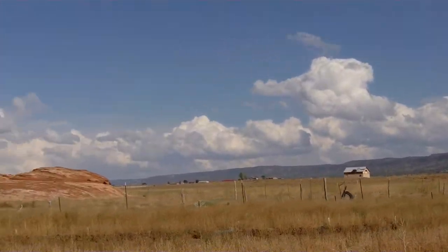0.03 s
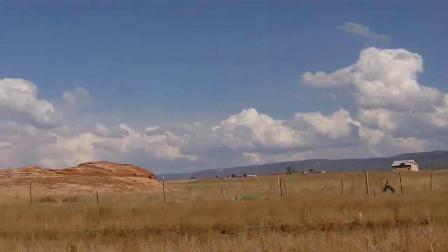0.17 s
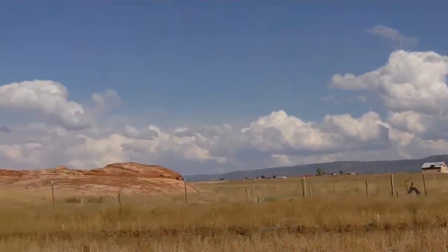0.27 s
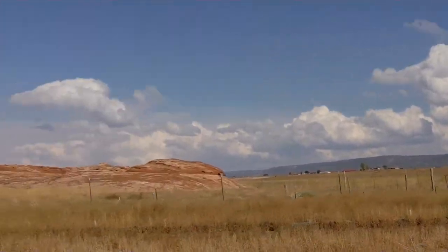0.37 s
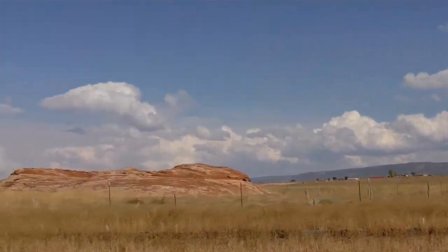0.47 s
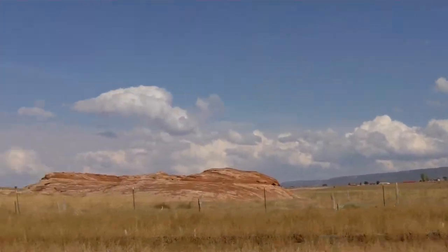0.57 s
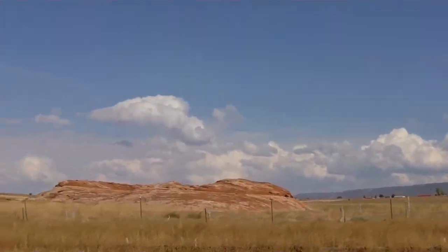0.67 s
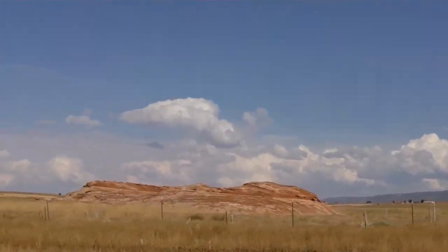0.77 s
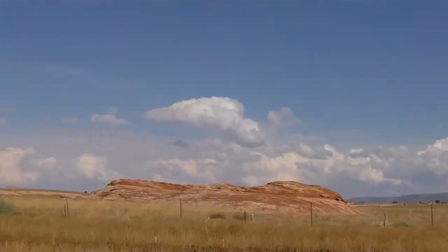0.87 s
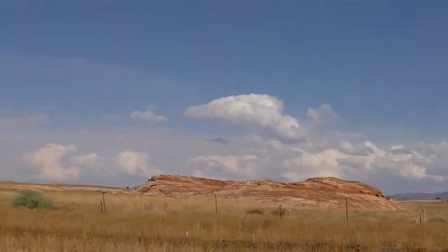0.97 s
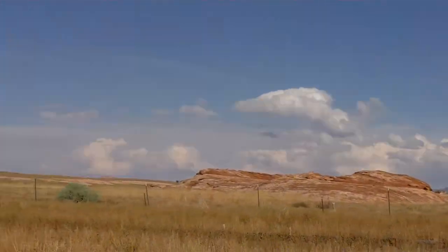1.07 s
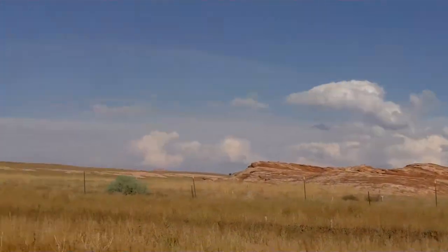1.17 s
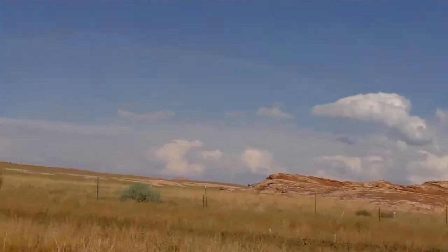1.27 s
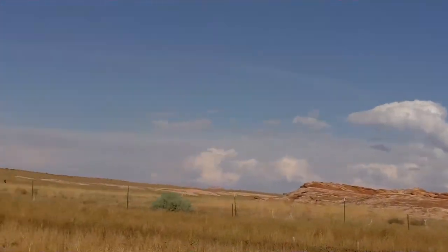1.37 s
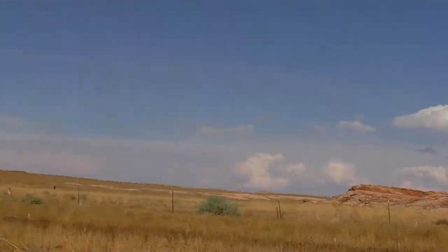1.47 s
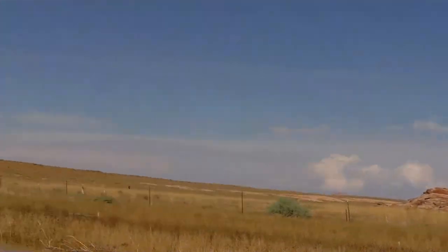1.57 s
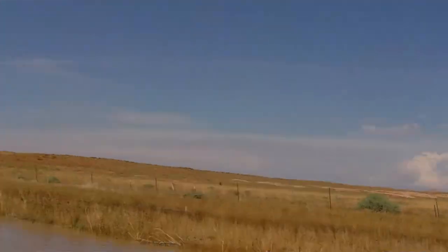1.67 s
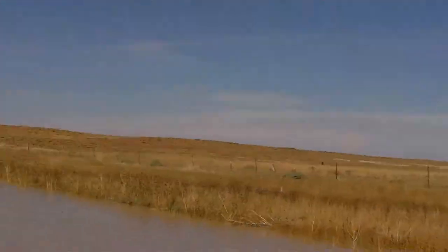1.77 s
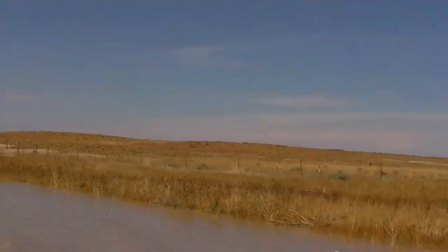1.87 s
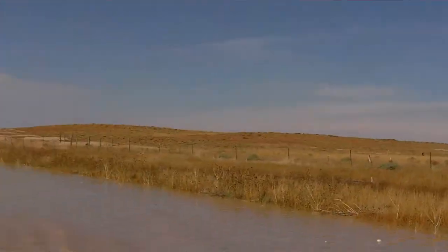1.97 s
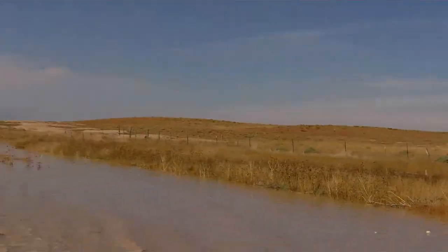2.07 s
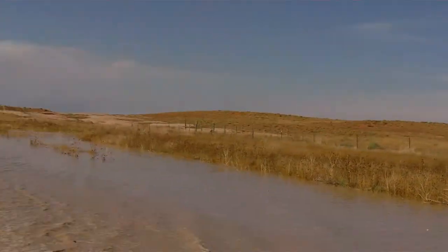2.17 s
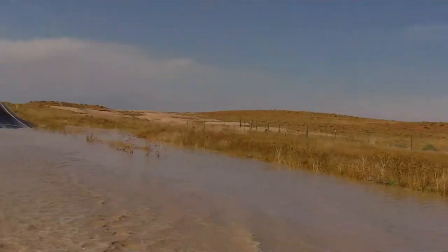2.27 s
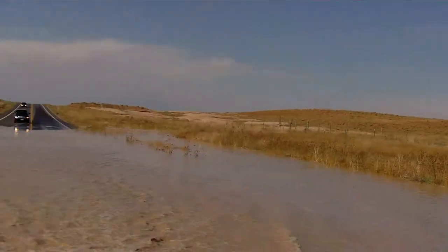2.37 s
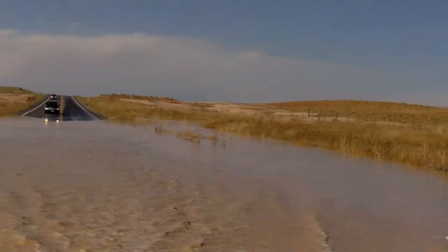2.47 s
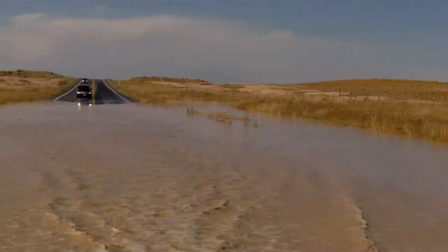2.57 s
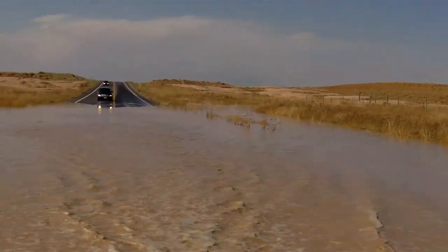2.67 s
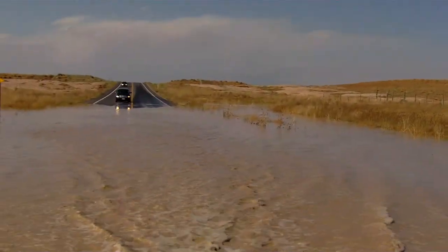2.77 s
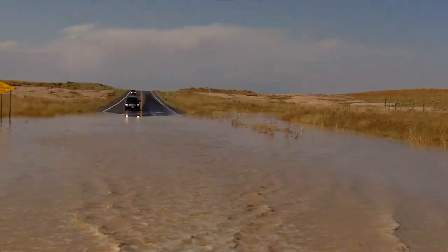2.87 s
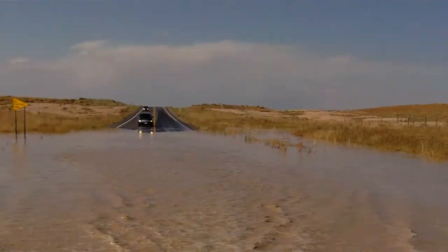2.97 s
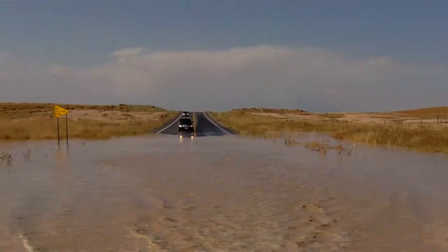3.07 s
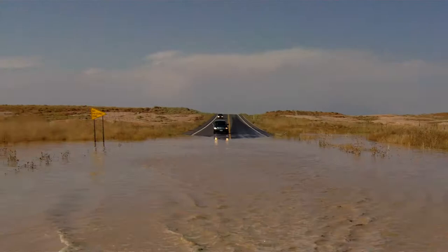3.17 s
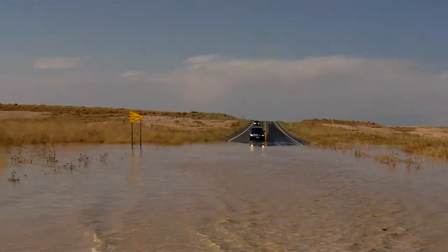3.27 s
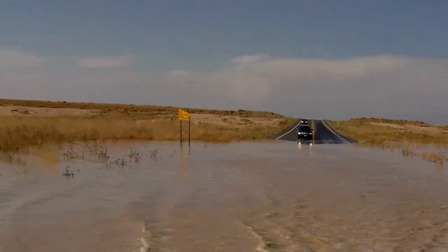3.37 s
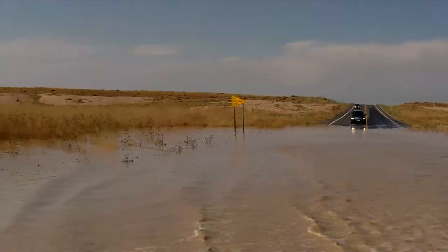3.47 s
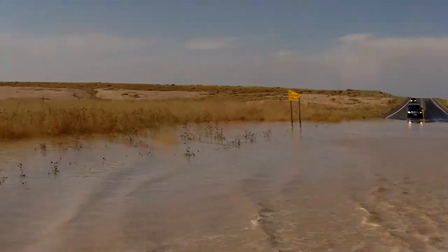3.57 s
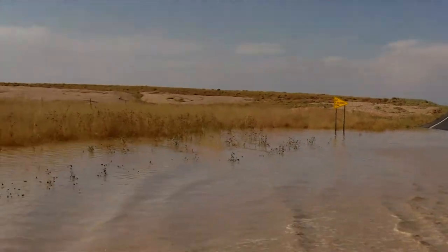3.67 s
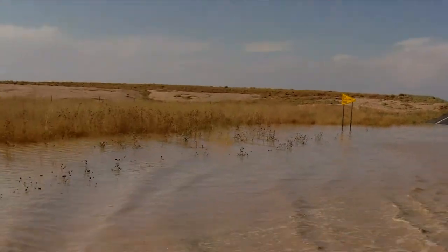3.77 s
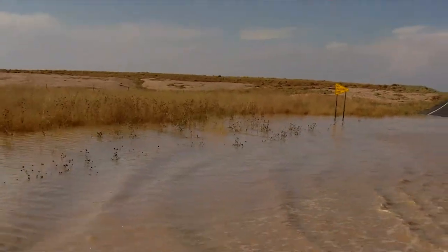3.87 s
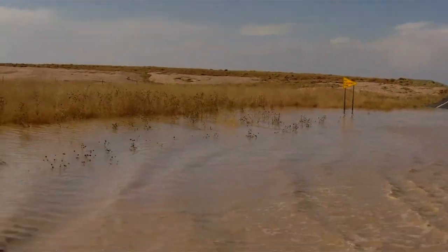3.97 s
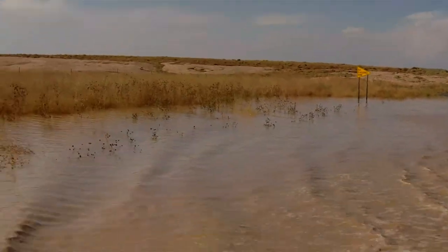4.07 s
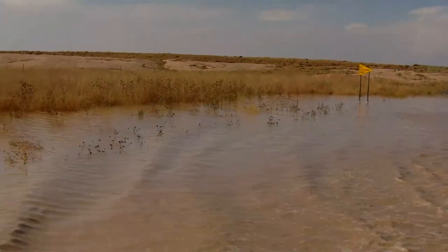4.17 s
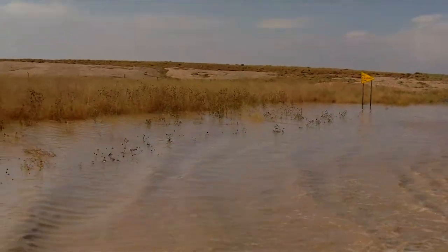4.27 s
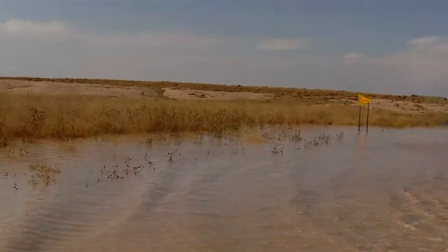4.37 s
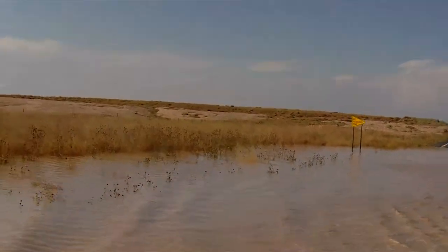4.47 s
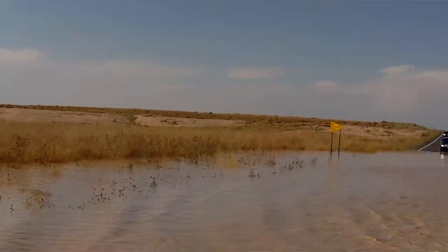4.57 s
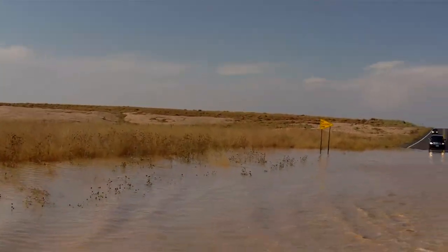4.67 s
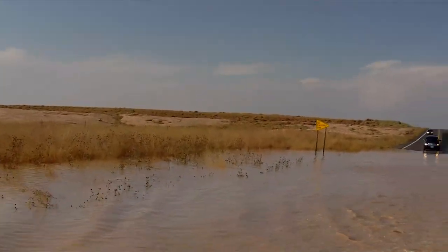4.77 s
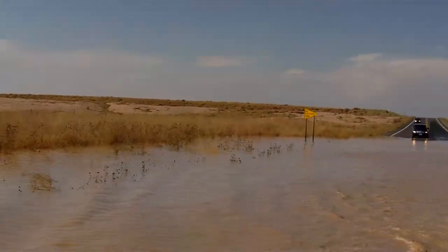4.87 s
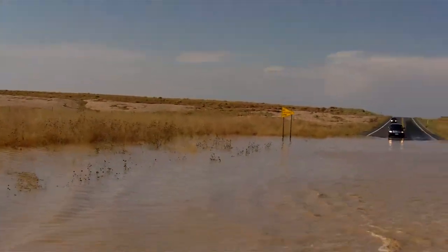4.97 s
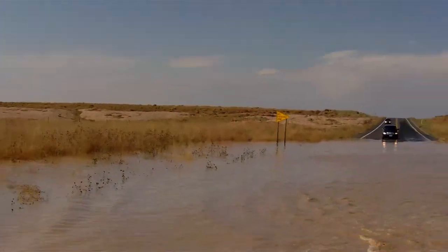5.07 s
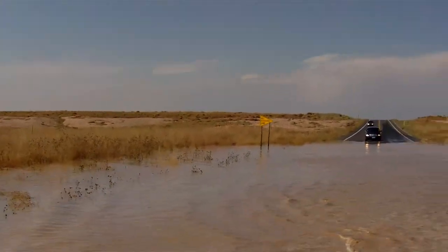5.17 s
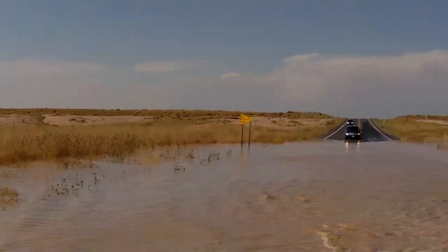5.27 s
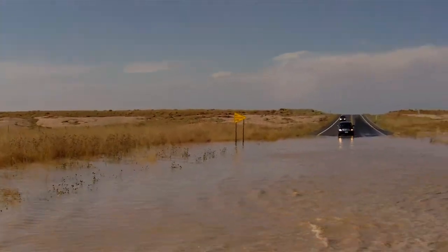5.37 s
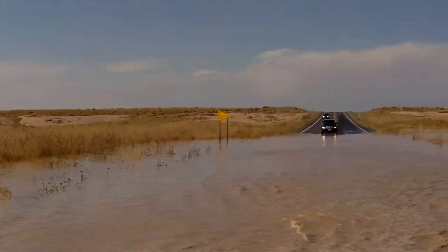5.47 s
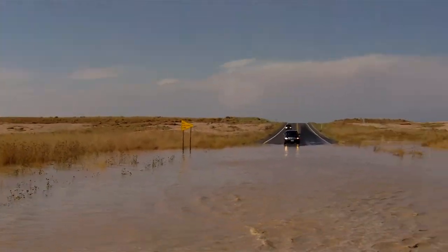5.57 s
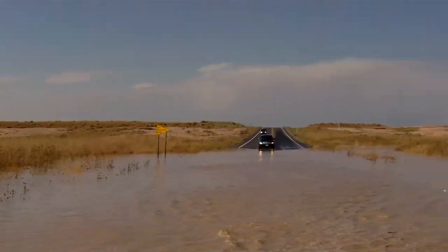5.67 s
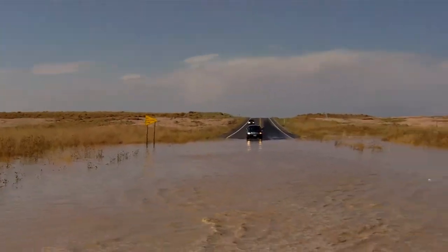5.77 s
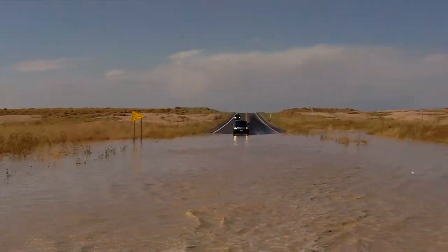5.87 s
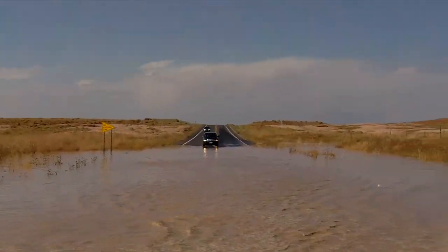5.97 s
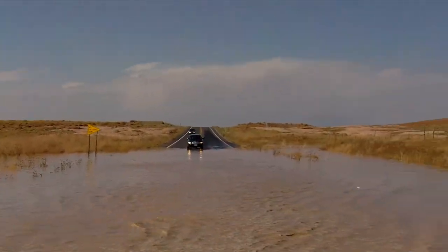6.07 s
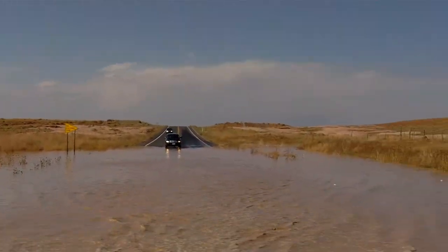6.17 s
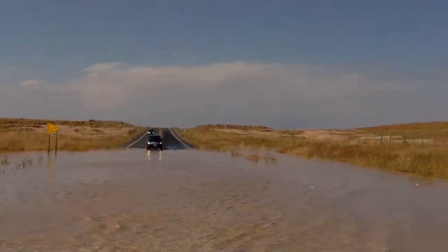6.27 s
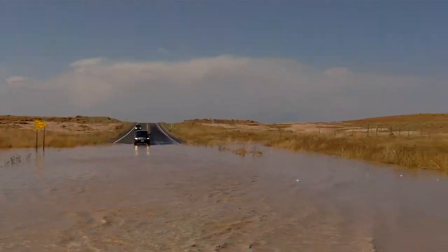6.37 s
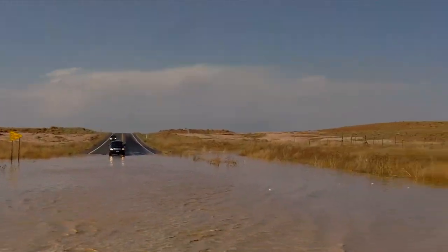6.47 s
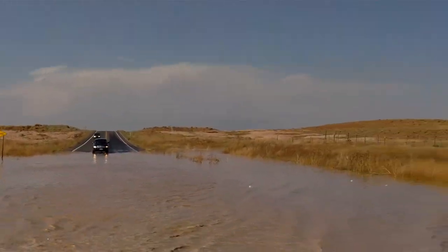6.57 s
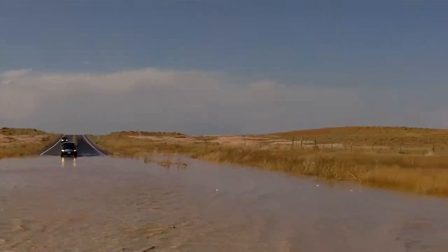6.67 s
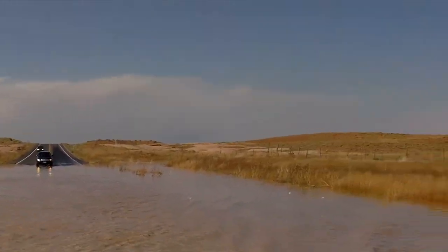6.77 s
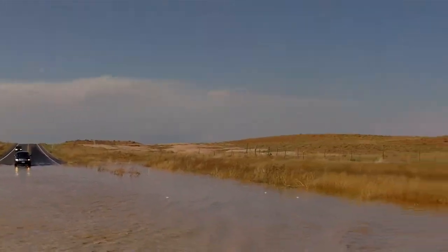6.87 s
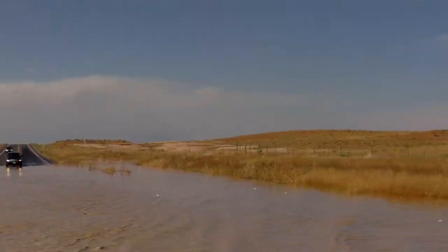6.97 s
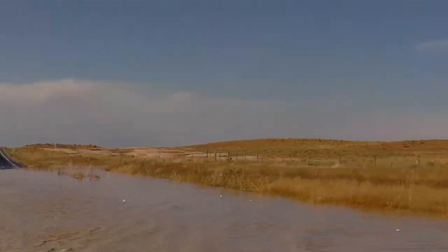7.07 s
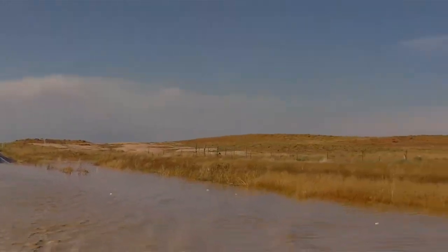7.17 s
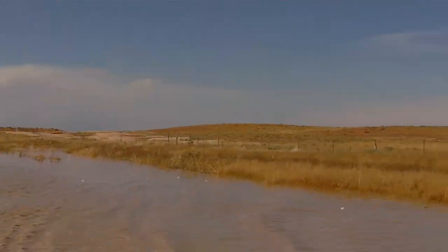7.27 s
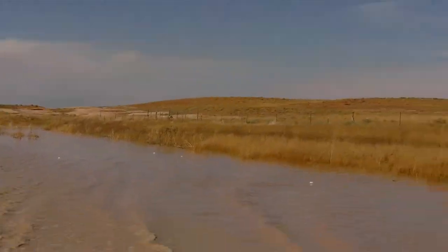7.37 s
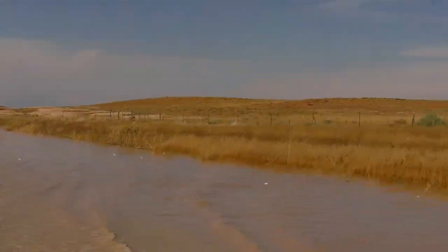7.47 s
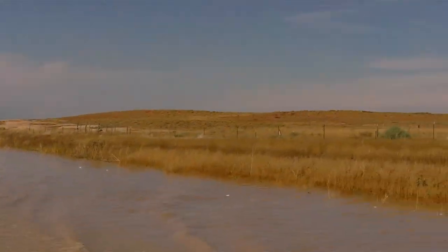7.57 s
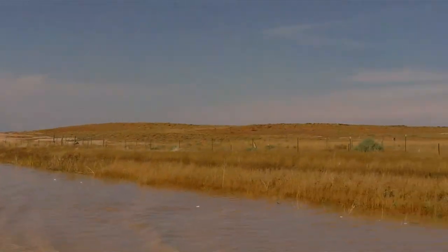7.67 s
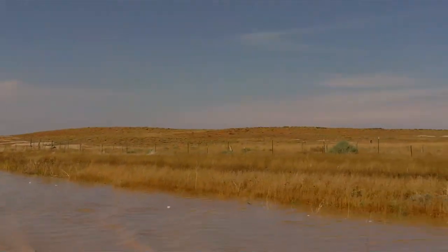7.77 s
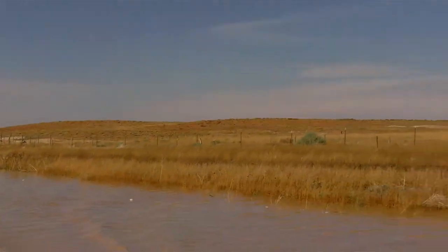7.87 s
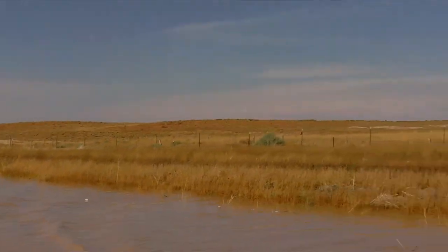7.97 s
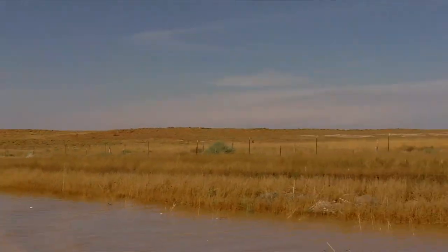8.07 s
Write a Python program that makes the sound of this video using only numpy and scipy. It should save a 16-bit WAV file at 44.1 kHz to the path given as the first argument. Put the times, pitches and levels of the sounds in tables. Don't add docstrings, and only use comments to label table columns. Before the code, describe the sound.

Shallow floodwater rushes steadily across a country road, dull and distant at first, then brighter with fizzing wavelets, gurgles and small drops close by.

```python
import sys
import numpy as np
from scipy import signal
from scipy.fft import rfft, irfft, next_fast_len
from scipy.io import wavfile
from scipy.ndimage import uniform_filter1d, map_coordinates

SR = 44100
rng = np.random.default_rng(int(sys.argv[2]) if len(sys.argv) > 2 else 0)


def attenuation_scalar(level_db):
    decades = np.asarray(level_db, float) / 20
    return 10 ** decades


def store_wav(level_fs):
    pcm = np.round(np.clip(np.atleast_2d(level_fs), -1, 1) * 32767)
    wavfile.write(sys.argv[1], SR, pcm.T.astype(np.int16))


N = 358533


def unit(x):
    return x / np.sqrt(np.mean(x ** 2) + 1e-20)


def curves(rows):
    time_s, *columns = np.transpose(rows)
    return [np.interp(np.arange(N) / SR, time_s, c) for c in columns]


def wobble(rate_hz):
    knots = rng.standard_normal(int(N * rate_hz / SR) + 4)
    return map_coordinates(knots, [np.arange(N) * rate_hz / SR])


def swells(time_s, height_db, half_s):
    t = np.arange(0, N + 64, 64) / SR
    bells = np.exp(-.5 * ((t[:, None] - time_s) / np.maximum(half_s, .01)) ** 2) @ height_db
    return np.interp(np.arange(N) / SR, t, bells)


def filtered(x, response):
    m = next_fast_len(N + 8192)
    return irfft(rfft(x, m) * response(np.fft.rfftfreq(m, 1 / SR)), m)[..., :N]


def coloured(x, spectrum):
    f, db = np.transpose(spectrum)
    return unit(filtered(x, lambda hz: attenuation_scalar(np.interp(np.log(hz + 1), np.log(f), db, -120, -120))))


def rush(patchy_db):
    z = signal.stft(rng.standard_normal(N + 512), nperseg=512)[2]
    field = uniform_filter1d(rng.standard_normal(z.shape), size=8, axis=0)
    field = uniform_filter1d(field, size=8, axis=1)
    return signal.istft(z * attenuation_scalar(patchy_db * unit(field)), nperseg=512)[1][:N]


def bubbles(count, pitch_hz, octaves, cycles, scatter_db, size):
    at, chance = rng.random(count), rng.standard_normal(count)
    gain = attenuation_scalar(scatter_db * rng.exponential(size=count))[:, None]
    hz = np.clip(pitch_hz * 2 ** (octaves * chance), 150, 15000)
    turns = hz[:, None] * np.arange(size) / SR
    fade = np.exp(-turns / cycles) * np.hanning(2 * size)[size:]
    tone = np.sin(2 * np.pi * turns * (1 + 0.037 * turns / cycles)) * fade
    where = (at * N).astype(int)[:, None] + np.arange(size)
    return unit(np.bincount(where.ravel(), (gain * tone).ravel(), N + size)[:N])


# (frequency [Hz], density [dB per Hz])
CHURN_COLOUR = [(350, -37), (600, -9), (850, -1.5), (1100, -1), (1400, -2.5), (1750, -6.5), (2400, -14),
                (4000, -34.5)]


def churn():
    large = bubbles(count=6000, pitch_hz=1300, octaves=.45, cycles=2.2, scatter_db=1.0, size=220)
    return coloured(rush(patchy_db=0.37) + 0.3 * large, CHURN_COLOUR)


# (frequency [Hz], density [dB per Hz])
FIZZ_COLOUR = [(700, -17), (1300, -9.5), (1900, -2), (2150, -0.5), (2450, -1), (2750, -3), (3600, -5.5),
               (5000, -9.5), (7000, -15.5), (10000, -42)]


def fizz():
    small = bubbles(count=9000, pitch_hz=3375, octaves=.55, cycles=1.4, scatter_db=1.5, size=120)
    return coloured(rush(patchy_db=0.9) + 0.37 * small, FIZZ_COLOUR)


# (frequency [Hz], density [dB per Hz])
SPRAY_COLOUR = [(2500, -5), (4000, -2.5), (5500, -2), (7000, -2), (9000, -3), (11000, -5.5), (13000, -9),
                (15500, -15)]


def spray():
    bursts = bubbles(count=12000, pitch_hz=6910, octaves=0.48, cycles=1.0, scatter_db=2.5, size=40)
    return coloured(rush(patchy_db=1.2) + 0.43 * bursts, SPRAY_COLOUR)


# (time [s], height [dB], share of large bubbles [ratio], half length [s])
CRESTS_ASIDE = [
    (0.23, 0.5, 1.8, 0.03),
    (0.61, 2, 0.95, 0.063),
    (0.91, 3, 0.21, 0.032),
    (1.14, 2, 0.0, 0.073),
    (1.22, 3.5, 0.0, 0.021),
    (1.35, 4, 0.0, 0.056),
    (1.58, 3.5, 0.02, 0.079),
    (1.88, 6, 0.24, 0.062),
    (2.07, 3.5, 0.44, 0.071),
]
# (time [s], height [dB], share of large bubbles [ratio], half length [s])
CRESTS_AHEAD = [(2.37, 2.7, 0.59, 0.03), (2.59, 3.1, 0.056, 0.046), (2.75, 2.9, 0.97, 0.038),
                (2.94, 3.8, 0, 0.025), (3.39, 2.5, 0.72, 0.037), (3.56, 3.1, 0.54, 0.058),
                (3.76, 1.7, 0.3, 0.053), (3.92, 2.4, 0.5, 0.067), (4.11, 3.2, 0.41, 0.036),
                (4.25, 3.2, 0.62, 0.082), (4.46, 2.8, 0.3, 0.048), (4.59, 3.5, 0.27, 0.056),
                (4.75, 1.6, 0.25, 0.022), (4.92, 3.7, 0.64, 0.077), (5.14, 1.8, 0.95, 0.018),
                (5.43, 1.9, 1.15, 0.04), (5.73, 3.7, 0.0, 0.063), (5.85, 3.7, 0.47, 0.031),
                (6.03, 2.3, 0.0, 0.043), (6.21, 0.91, 1.6, 0.023), (6.41, 3.5, 0.16, 0.028),
                (6.67, 4.8, 0.43, 0.053), (6.91, 4.4, 0.35, 0.039), (7.12, 3.4, 0.25, 0.081),
                (7.32, 4.7, 0.0, 0.057), (7.51, 5.3, 0.73, 0.084), (7.67, 4.7, 0.55, 0.048),
                (7.85, 6.6, 0.51, 0.077), (8.03, 6.4, 0.37, 0.095)]
# (time [s], near water on axis [dB], far riffles in view [dB])
TURN = [(0.0, -10, -29), (0.5, -11, -30.0), (1.0, -10.1, -31), (1.5, -8.5, -31), (1.75, -7, -29),
        (2.0, -3.5, -28.5), (2.25, 0.9, -28), (2.45, 4.5, -26.5), (3.2, 4.5, -26), (3.6, 6.0, -25.7),
        (4.4, 4, -26.5), (5.2, 7, -26.5), (5.9, 4.9, -27.5), (6.5, 3.5, -29), (7.2, 1.4, -28.5),
        (7.7, -0.5, -29.5), (8.13, -3.2, -26.5)]


def near_wavelets():
    facing_db, _ = curves(TURN)
    time_s, height_db, large_share, half_s = np.transpose(list(CRESTS_ASIDE) + list(CRESTS_AHEAD))
    crest_db = swells(time_s, height_db, half_s)
    large_db = swells(time_s, height_db * large_share, half_s)
    flutter_db = 0.68 * wobble(22) + 0.7 * wobble(50) + 0.92 * wobble(160)
    churn_db = -29.5 + 0.39 * facing_db + 1.15 * large_db + 0.23 * flutter_db
    fizz_db = -34.5 + 0.534 * facing_db + 0.7852 * crest_db + 0.42 * large_db + 0.43 * flutter_db
    spray_db = -38 + 1.18 * facing_db + 1.145 * crest_db + 0.07 * large_db + 1.2 * flutter_db
    return attenuation_scalar(churn_db) * churn() + attenuation_scalar(fizz_db) * fizz() + attenuation_scalar(spray_db) * spray()


# (time [s], peak [dB], pitch [Hz])
DROPS = [(0.4934, -28, 2030), (0.8654, -30, 2330), (0.9144, -22, 2880), (1.2925, -25, 3040),
         (2.0218, -15, 2620), (2.2917, -15, 2050), (2.3266, -18, 2380), (2.3496, -9, 4430),
         (2.3794, -7, 2170), (2.4114, -19, 2090), (2.5785, -12, 2330), (3.3584, -16, 2270),
         (3.4634, -17, 2240), (3.571, -12, 2650), (3.875, -8.5, 4080), (4.0756, -11, 2470),
         (4.9325, -7, 4300), (5.1274, -10, 3400), (5.1394, -10, 5000), (5.9439, -25, 2550),
         (6.0302, -20, 2250), (6.5375, -13, 2150), (6.6544, -9, 2360), (7.1394, -12, 3320),
         (7.4704, -19, 2550), (7.6665, -13, 2300), (7.8376, -10, 2270), (7.9874, -12, 2100)]
# (time [s], peak [dB], pitch [Hz])
GURGLES = [(0.73, -22, 1400), (2.157, -15, 1100), (2.728, -12, 1150), (2.806, -13, 1050),
           (4.885, -14, 1300), (7.145, -14, 900), (7.597, -14, 1500), (2.27, -20, 813), (2.352, -8.5, 990),
           (2.597, -16, 1160), (3.029, -11, 1060), (3.26, -19, 1210), (3.322, -25, 929), (3.391, -9, 1370),
           (4.404, -11, 945), (4.474, -11, 1430), (4.522, -20, 875), (4.691, -18, 960), (4.959, -6, 1100),
           (5.107, -21, 1140), (5.498, -16, 1150), (6.641, -13, 1180), (6.695, -18, 1080),
           (6.893, -25, 1030), (7.439, -22, 996), (7.529, -11, 1060), (7.641, -14, 1200),
           (7.797, -21, 1020), (7.841, -11, 953), (8.103, -13, 900)]
# (time [s], peak [dB], pitch [Hz])
TAPS = [
    (6.3362, -4, 4850),
    (6.3363, -16, 7600),
    (6.3363, -21, 10500),
    (8.1025, -4, 3250),
    (8.1027, -13, 4400),
]


def drops():
    ticks, spits, t = np.zeros(N + SR), np.zeros(N + SR), np.arange(SR // 40) / SR
    attack = 1 - np.exp(-t / 0.00045)
    # (events, t60 [s], spit under the peak [dB])
    for rows, t60_s, spit_db in ((DROPS, 0.0055, -10), (GURGLES, 0.017, -22), (TAPS, 0.0058, -22)):
        for time_s, db, hz in rows:
            at = slice(round(time_s * SR), round(time_s * SR) + len(t))
            ticks[at] += attenuation_scalar(db - 60 * t / t60_s) * np.sin(2 * np.pi * hz * t) * attack
            spits[at] += attenuation_scalar(db + spit_db - 60 * t / 0.023) * rng.standard_normal(len(t))
    return ticks[:N] + filtered(spits[:N], lambda hz: 1j * hz * 6000 / (5000 ** 2 - hz ** 2 + 1j * hz * 6000))


# (frequency [Hz], density [dB per Hz])
ROAR_COLOUR = [(76, -49), (130, -28), (300, -9), (380, -6), (560, -1), (750, -1.5), (1100, -10.5),
               (1600, -15), (2500, -17), (9000, -50.5)]


def far_riffles():
    _, far_db = curves(TURN)
    return attenuation_scalar(far_db - 2.5) * coloured(rng.standard_normal(N), ROAR_COLOUR)


# (frequency [Hz], density [dB per Hz])
RUMBLE_COLOUR = [(20, -14), (40, -12), (70, -4.5), (110, 3.5), (160, 4.5), (230, -20), (350, -40)]
# (time [s], height [dB])
BUMPS = [(0.17, 12), (1.63, 6), (2.81, 7), (3.06, 9), (3.26, 14), (3.51, 10), (3.8, 5), (4.05, 9),
         (4.48, 4), (4.75, 6), (5.14, 5), (5.34, 5), (6.47, 8), (6.77, 4), (6.97, 11), (7.9, 17),
         (8.13, 15)]


def handling():
    time_s, height_db = np.transpose(BUMPS)
    buffet_db = -67 + swells(time_s, height_db, half_s=0.045) + 1.6 * wobble(12)
    return attenuation_scalar(buffet_db) * coloured(rng.standard_normal(N), RUMBLE_COLOUR)


# (time [s], firing rate [Hz], rms [dB])
IDLE = [
    (0.0, 43.5, -82),
    (1.4, 43, -80),
    (1.95, 46.5, -77),
    (3.1, 46, -74),
    (3.6, 44.5, -81),
    (4.5, 46.5, -74),
    (5.95, 43.5, -76.5),
    (6.9, 46.2, -74),
    (8.13, 46.2, -72),
]


def far_engine():
    firing_hz, idle_db = curves(IDLE)
    turn = 2 * np.pi * np.cumsum(firing_hz * (1 + 0.051 * wobble(6))) / SR
    return attenuation_scalar(idle_db + 3.5 + 2.2 * wobble(6)) * (np.sin(turn) + 0.34 * np.sin(2 * turn))


def scene():
    mono = near_wavelets() + drops() + far_riffles() + handling() + far_engine()
    return np.tile(mono, (2, 1))


# (frequency [Hz], common step [dB], difference step [dB])
STEP = [(102, -56, -21.5), (696, -36, -16.5), (1110, -22, -10), (1513, -29, -7.5), (2230, -22.5, -6.5),
        (3470, -20, -8), (5720, -19, -7.5), (9100, -15, -3.5), (12060, 1.5, 2), (13960, 3.5, 9),
        (15700, 9.5, 14)]
# (frequency [Hz], level [dB])
HEARING = [(3000, -95), (9000, -81), (12000, -66), (15500, -50)]


def coarse_side(pair):
    frame, used, lead = 1024, 720, 2 * 1024 - 272
    n, k = np.arange(2 * frame) + .5, np.arange(used) + .5
    window = np.sin(np.pi * n / (2 * frame))[:, None]
    basis = window * np.cos(np.pi / frame * np.outer(n + frame / 2, k)) * np.sqrt(2 / frame)
    padded = np.pad(pair, ((0, 0), (lead, -(N + lead) % frame + frame))).reshape(2, -1, frame)
    lines = np.concatenate([padded[:, :-1], padded[:, 1:]], axis=2) @ basis
    bands = lines.reshape(2, lines.shape[1], -1, 16)
    level = np.sqrt(np.mean(bands ** 2, axis=3, keepdims=True)) + 1e-9

    def on_lines(hz, db):
        line_hz = k * SR / (2 * frame)
        return np.interp(np.log(line_hz), np.log(hz), db).reshape(bands.shape[2:])

    hz, *steps_db = np.transpose(STEP)
    coarse_db = np.array([on_lines(hz, db) for db in steps_db])[:, None]
    busy = (np.std(lines[0], axis=1) / np.std(lines[0]) + 1e-9)[:, None, None] ** .4
    step = level[0] * busy * attenuation_scalar(coarse_db + 1.7 * rng.standard_normal(level.shape))
    kept = level > step * attenuation_scalar(-8.5)
    step = np.hypot(step, attenuation_scalar(on_lines(*np.transpose(HEARING))))
    rounded = kept * np.sign(bands) * np.floor(np.abs(bands) / step + 0.32) * step
    halves = (rounded.reshape(lines.shape) @ basis.T).reshape(2, -1, 2, frame)
    joined = halves[:, 1:, 0] + halves[:, :-1, 1]
    return joined.reshape(2, -1)[:, lead - frame:][:, :N]


def top_cut(x):
    return signal.sosfilt(signal.butter(12, 15720, fs=SR, output="sos"), x)


def record(dry):
    notch_hz, width_hz, top_hz = 7845, 260, 15260

    def path(hz):
        gap = notch_hz ** 2 - hz ** 2
        return (hz < top_hz) * gap / (gap + 1j * hz * width_hz)

    right = filtered(dry[0], path)
    left = np.roll(right, 1)
    mid, side = coarse_side(np.array([left + right, left - right]) / 2)
    return top_cut(np.array([mid + side, mid - side]))


dry = scene()
out = record(dry)
store_wav(out)
```